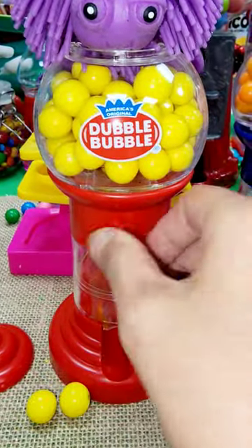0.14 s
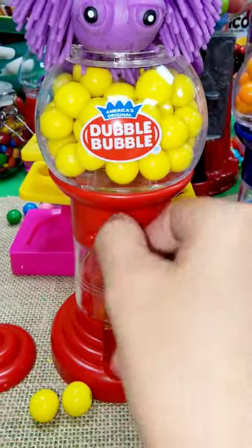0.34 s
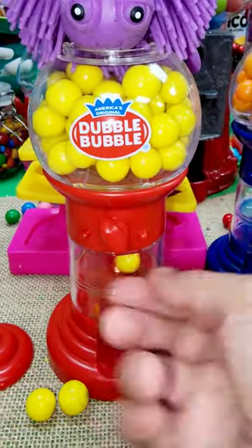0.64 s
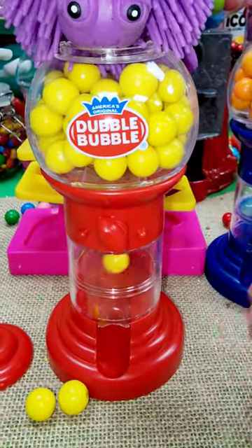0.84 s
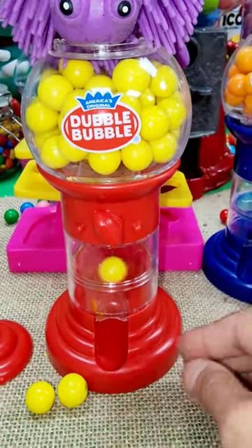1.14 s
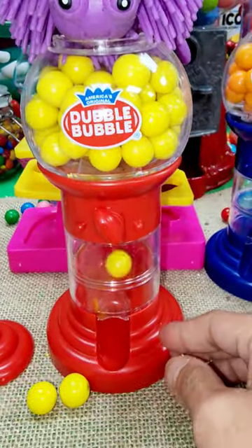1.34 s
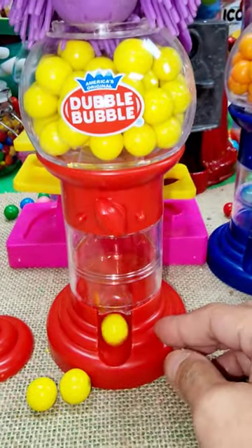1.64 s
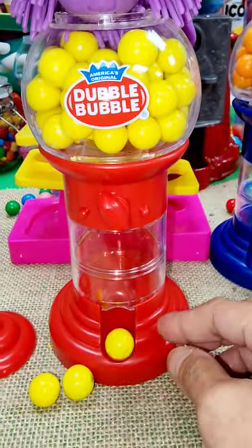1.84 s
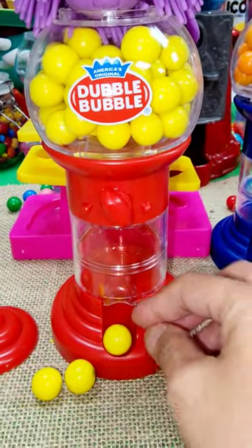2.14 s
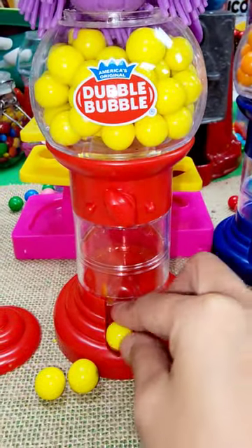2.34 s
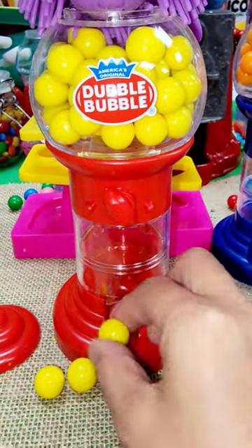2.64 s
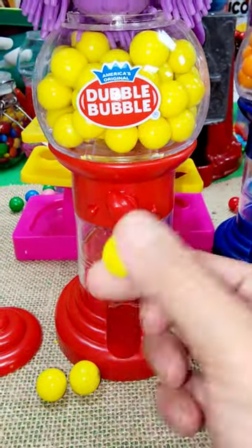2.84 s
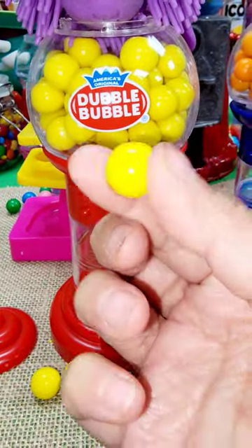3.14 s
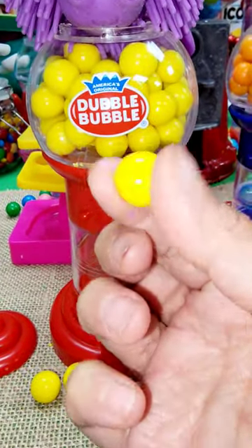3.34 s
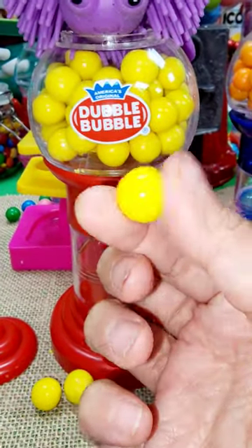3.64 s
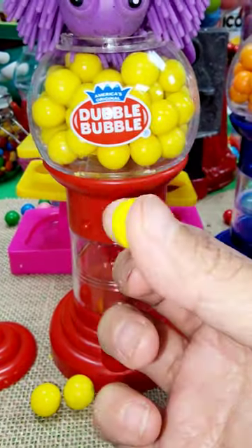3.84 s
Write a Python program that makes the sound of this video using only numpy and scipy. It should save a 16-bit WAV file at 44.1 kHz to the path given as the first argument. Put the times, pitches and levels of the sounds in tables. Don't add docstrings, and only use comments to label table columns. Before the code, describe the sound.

Close up in a small room, a gumball chatters down a hollow plastic tower and ends in hard clacks, then soft handling ticks and rubs, with a quiet motor hum throughout.

```python
import sys
import numpy as np
from scipy import signal
from scipy.fft import rfft, irfft, next_fast_len
from scipy.io import wavfile
from scipy.ndimage import map_coordinates

SR = 44100
rng = np.random.default_rng(int(sys.argv[2]) if len(sys.argv) > 2 else 0)


def log_audio(samples):
    frames = np.atleast_2d(samples).T
    limited = np.clip(frames, -1, 1)
    pcm = np.round(limited * 32767).astype(np.int16)
    wavfile.write(sys.argv[1], SR, pcm)


def to_linear_factor(level_db):
    exponent = np.asarray(level_db, float) / 20
    return 10 ** exponent


N = 176400

# (f/Hz, level/dB, t60/s)
TOWER = [(686, -17.5, 0.04), (838.7, -12.5, 0.047), (960, -3, 0.014), (1303, -11, 0.02),
         (1758, -2.5, 0.015), (1930, -1.5, 0.013), (2245, -12, 0.035), (3151, -17.5, 0.028),
         (3940, -2.5, 0.013), (4670, -6, 0.018), (5600, -13, 0.009), (6376, -15, 0.045), (6920, -6, 0.012),
         (7316, -4.5, 0.041)]
# (f/Hz, level/dB, t60/s)
RIM = (8000, -10, .012)
LOWER_TOWER = TOWER[:-1] + [RIM]
# (f/Hz, level/dB, t60/s)
CHUTE = [(700, -13, 0.011), (1000, -21.5, 0.011), (1450, -10, 0.024), (1820, -0.5, 0.02), (1955, -1, .02),
         (2250, -2, 0.016), (2880, 0, 0.022), (3900, -1, 0.012), (4550, -3, .013), (5500, -2.5, 0.0087),
         (6050, 0.5, 0.0076), (6620, -2.5, 0.017), (7400, -13, 0.019)]
TOWER_PAN_DB = -5.5


def unit(x):
    return x / np.sqrt(np.mean(x ** 2) + 1e-20)


def along(points, hz):
    f, v = np.transpose(points)
    return np.interp(np.log(hz + 1), np.log(f + 1), v)


def level(rows, s):
    t, db = np.transpose(rows)
    return np.interp(s, t, db, left=-120, right=-120)


def wobble(rate):
    knots = rng.standard_normal(int(N * rate / SR) + 4)
    return map_coordinates(knots, [np.arange(N) * rate / SR])


def filtered(x, response):
    m = next_fast_len(N + 8192)
    return irfft(rfft(x, m) * response(np.fft.rfftfreq(m, 1 / SR)), m)[..., :N]


def sides(pan_db):
    return to_linear_factor(np.multiply.outer([.5, -.5], pan_db))


def rush(spectrum, alike):
    def mid_side(hz):
        turn = np.arccos(np.clip(along(alike, hz), -1, 1)) / 2
        return to_linear_factor(along(spectrum, hz)) * [np.cos(turn), np.sin(turn)]

    mid, side = filtered(rng.standard_normal((2, N)), mid_side)
    return unit(np.array([mid + side, mid - side]))


def struck(hits, pan_db, modes, contact_s, colour_db, ring_db, crack_db, twist,
           grind=0., hollow=0.18, tilt_db=0., spot_db=0., blow=0.82):
    # (f/Hz, level/dB per Hz)
    snap_spectrum = [(600, -21), (1800, -18), (2600, -10.5), (4300, -11), (7600, -5), (9200, -22.5),
                     (11700, -17.5), (16500, -20)]
    s, db = np.transpose(hits)[:2]
    mode_hz, modes_db = np.transpose(modes)[:2]
    at = np.round(s * SR).astype(int)
    t = np.arange(SR // 20) / SR
    scrape = np.exp(-(t / contact_s) ** 0.93) * (1 - np.exp(-t / (0.15 * contact_s)))
    push = np.hanning(7)

    tilt = np.outer(tilt_db + 0 * s, np.log2(mode_hz / 3000))
    mix = to_linear_factor(colour_db * rng.standard_normal((len(s), len(modes))) + tilt)
    if spot_db:
        octaves = np.log2(np.outer(1 / np.transpose(hits)[-1], mode_hz))
        mix = mix * to_linear_factor(spot_db * np.exp(-(octaves / .08) ** 2))
    mix = mix / np.sqrt((mix ** 2) @ to_linear_factor(2 * modes_db))[:, None]

    def force(share, noise=1, push_gain=0):
        train = np.array([np.bincount(at, g * to_linear_factor(db) * share, N) for g in sides(pan_db + 0 * s)])
        rough = signal.oaconvolve(train, scrape[None], axes=1)[:, :N] * noise
        return rough + push_gain * signal.oaconvolve(train, push[None], axes=1)[:, :N]

    snap = to_linear_factor(0.53 * (db - db.max()) + 2 * tilt_db + 2 * rng.standard_normal(len(s)))
    crack = to_linear_factor(crack_db) * (force(snap) + grind) * rush(snap_spectrum, [(1000, .9), (8000, 0.1)])
    out = 0
    noise = rng.standard_normal((len(modes), N))
    for k, (hz, mode_db, t60) in enumerate(modes):
        pole = np.exp((2j * np.pi * hz - np.log(1000) / max(t60, .002)) / SR)
        drive = force(mix[:, k], noise[k], blow) + hollow * grind * noise[k]
        ring = signal.lfilter([1], [1, -pole], drive, axis=1)
        lean = np.exp(1j * twist * rng.standard_normal() * np.array([[.5], [-.5]]))
        out = out + to_linear_factor(mode_db + ring_db) * (lean * ring).imag / np.sqrt(contact_s * SR)
    return crack + signal.sosfilt(signal.butter(4, 8600, fs=SR, output="sos"), out)


def ball():
    # (t/s, peak level/dB, best-rung mode f/Hz)
    bounces = [(0.0181, -10, 6110), (0.0427, -10, 7130), (0.0686, -10, 6850), (0.0895, -16.5, 6780),
               (0.11, -14, 7190), (0.1344, -13.5, 7360), (0.1556, -20, 3930), (0.1698, -13, 3900),
               (0.1921, -15, 3820), (0.2104, -17, 6700), (0.2259, -25.5, 6970), (0.2308, -14, 7130),
               (0.2475, -24, 4540), (0.2567, -17, 6600), (0.2665, -21.5, 1730), (0.2826, -15.5, 1860),
               (0.2921, -20.5, 996), (0.3056, -16, 2205), (0.3467, -12.5, 5700), (0.3541, -13.5, 3130),
               (0.3605, -19.5, 3230), (0.3747, -23, 1990), (0.3976, -10.5, 7100), (0.4024, -16.5, 7300),
               (0.4218, -29, 3070), (0.4291, -33.5, 2410), (0.4431, -15, 3180), (0.4674, -26.5, 6900),
               (0.5016, -28.5, 6680), (0.5173, -17.5, 3900), (0.5248, -18, 3940), (0.5318, -21, 1770),
               (0.5395, -22.5, 6120), (0.5476, -24.5, 4160), (0.5553, -25, 6240), (0.5624, -29, 4150),
               (0.5695, -26.5, 960), (0.6539, -24, 4390), (0.6987, -32.5, 1690), (0.72, -32, 4850),
               (0.73, -25.5, 4620), (0.7475, -24, 4880), (0.7654, -21.5, 1713), (0.772, -26.5, 1640),
               (0.8003, -36, 1063), (0.8413, -32, 983)]
    # (t/s, peak level/dB, best-rung
    # mode f/Hz)
    knocks = [(0.8846, -38, 1060), (0.8951, -31.5, 1770), (0.9145, -24, 3730), (0.9232, -25, 3830),
              (0.9311, -19, 4540), (0.939, -23.5, 2930), (0.947, -24, 7080), (0.9531, -20.5, 3960),
              (0.9601, -18.5, 3920), (0.9671, -22, 1680), (0.9771, -21, 1790), (0.9908, -24, 4800),
              (1.0265, -17.5, 3960), (1.0386, -16.5, 3010), (1.0472, -22.5, 7130), (1.0549, -21.5, 3380),
              (1.065, -24, 3920), (1.0812, -28.5, 1770), (1.0883, -23.5, 4800), (1.0959, -18, 3960),
              (1.1007, -17, 3730), (1.1103, -20, 2370), (1.1193, -13.5, 3980), (1.129, -17, 3960),
              (1.1334, -13.5, 6890), (1.1555, -15.5, 4070), (1.1686, -18, 1740), (1.1938, -34.5, 7130),
              (1.2027, -7.5, 3960), (1.2241, -15, 1770), (1.2327, -20, 4870), (1.2421, -26, 4290),
              (1.2474, -20, 4540), (1.255, -13.5, 4050), (1.2612, -14.5, 3980), (1.2673, -15, 4520),
              (1.2731, -19.5, 7560), (1.2827, -10.5, 4030), (1.2902, -12.5, 3940), (1.2991, -16, 2260),
              (1.3129, -27, 1740), (1.3233, -27.5, 3940), (1.3407, -22.5, 4870), (1.348, -19.5, 3880),
              (1.3563, -17, 3640), (1.3657, -14, 7300), (1.3732, -9, 6800), (1.3871, -11.5, 3980),
              (1.3976, -16.5, 4010), (1.4089, -15.5, 4820), (1.4146, -18.5, 4390), (1.4319, -8.5, 4520),
              (1.4376, -15, 1460), (1.4467, -18, 4720), (1.458, -20.5, 4720), (1.4672, -21.5, 3640),
              (1.073, -28.5, 3900),
        (1.4046, -18, 4000),
        (1.4214, -16.5, 2000),
        (1.523, -21, 6900),
    ]
    # (t/s, peak level/dB, left-right/dB, brightness/dB per octave, best-rung mode f/Hz)
    clacks = [(1.484, -2, 0.5, 1.1, 1820), (1.4994, -7, -4.5, 0.5, 4550), (1.5283, -2.5, 4, 2.6, 1940),
              (1.5635, -18.5, -0.5, 2, 6050), (1.5860, -2.5, -1.5, -0.7, 6050),
              (1.622, -8, -8.5, -0.3, 6700), (1.6387, -5, -4, 1, 3900), (1.6504, -13, -7, -0.6, 3900),
              (1.6823, -7.5, -8, 3, 3900), (1.701, -17.5, -6, -3, 1450), (1.7146, -26.5, -1, -3.5, 1450),
              (1.7219, -21.5, -1.5, -3.7, 1600)]
    clack_pan_db, clack_tilt_db = np.transpose(clacks)[2:4]
    upper = struck(bounces, TOWER_PAN_DB, TOWER, contact_s=0.0027, colour_db=3, ring_db=3.0,
                   crack_db=-5, twist=1.2, spot_db=9.5)
    lower = struck(knocks, TOWER_PAN_DB, LOWER_TOWER, contact_s=0.0018, colour_db=3.0,
                   ring_db=3.0, crack_db=-8.5, twist=1.8, spot_db=11)
    chute = struck(clacks, clack_pan_db, CHUTE, contact_s=0.0034, colour_db=2.5, ring_db=1.3,
                   crack_db=-10.5, twist=1.6, tilt_db=clack_tilt_db, spot_db=9.5, blow=1.8)
    return upper + lower + chute + rolling()


def rolling():
    # (t/s, level/dB)
    roll = [(0, -44), (.27, -36), (.33, -41), (.53, -36), (.63, -56), (.66, -43), (.765, -31), (.81, -53),
            (.88, -47.5), (.96, -27), (1.018, -42), (1.08, -29), (1.19, -42), (1.26, -30), (1.33, -41),
            (1.415, -26), (1.48, -41)]
    ticks_per_s, jitter, spread_db = 120, 0.28, 5.5
    draw = rng.standard_normal((SR // 150, 2))
    s = np.abs(np.arange(len(draw)) + jitter * draw[:, 0]) / ticks_per_s
    ticks = np.transpose([s, level(roll, s) - 7 + spread_db * draw[:, 1]])
    grind = to_linear_factor(level(roll, np.arange(N) / SR) - 12 + 4.4 * wobble(90))
    grind = grind * sides(TOWER_PAN_DB)[:, None]
    return struck(ticks, TOWER_PAN_DB, LOWER_TOWER, contact_s=0.0016, colour_db=3.0, ring_db=10.5,
                  crack_db=-1, twist=0.69, grind=grind)


def fingers():
    # (t/s, peak level/dB, brightness/dB per octave, best-rung mode f/Hz)
    taps = [
        (1.8782, -48.5, -12, 1450),
        (1.9255, -46, 0, 1820),
        (1.9431, -34, -12.5, 2250),
        (1.978, -42.5, 3.5, 7400),
        (2.111, -38, -11.5, 700),
        (2.1864, -38, -4, 6650),
        (2.2252, -40, 4, 6650),
        (2.277, -53, 7, 1450),
    ]
    # (t/s, length/s, level/dB)
    scrapes = [
        (1.97, 0.14, -60),
        (2.118, 0.079, -51),
        (2.183, 0.11, -48.5),
        (2.25, 0.38, -64),
        (2.395, 0.05, -52),
        (2.51, 0.072, -59),
    ]
    # (t/s, length/s, level/dB)
    rubs = [
        (2.6, 0.52, -72),
    ]
    # (f/Hz, level/dB per Hz)
    skin = [(1760, -44), (3000, -6), (7310, 2.5), (10100, -21), (15100, -10), (16500, -34)]
    t = np.arange(N) / SR

    def strokes(rows):
        total = 0
        for s, long_s, db in rows:
            progress = np.clip((t - s) / long_s, 0, 1)
            total = total + to_linear_factor(db) * np.sin(np.pi * progress ** .6) ** 1.2
        return total

    grind = strokes(scrapes) * to_linear_factor(3.24 * wobble(110)) * sides(-6.5)[:, None]
    touches = struck(taps, -6.0, CHUTE, contact_s=0.0049, colour_db=1.0, ring_db=5.5, crack_db=-21.5,
                     twist=1.4, grind=grind * to_linear_factor(7.5), hollow=0.12,
                     tilt_db=np.transpose(taps)[2], spot_db=10)
    rub = strokes(rubs) * to_linear_factor(1.45 * wobble(37.48)) * rush(skin, [(2000, .5), (8000, 0.19)])
    return touches + rub


def table():
    # (t/s, level/dB)
    shake = [(0, -55.5), (1.5, -57.5), (1.75, -71)]
    # (f/Hz, level/dB per Hz)
    rumble = [(30, -16), (80, -5), (450, -7), (800, -8.5), (1300, -38.5)]
    swell = to_linear_factor(level(shake, np.arange(N) / SR) + 2.4 * wobble(8.4))
    return swell * rush(rumble, [(60, 0.76), (800, 0.81)])


def room(x):
    # (f/Hz, t60/s)
    early = [(500, 0.1), (4000, 0.11), (14000, 0.012)]
    late_db, late_t60_s, late_top_hz = -10.5, 0.64, 8000
    hz, t, z = signal.stft(rng.standard_normal((2, SR)), SR, nperseg=256)
    hz = hz[:, None]
    fade = to_linear_factor(-60 * t / along(early, hz))
    fade = fade + to_linear_factor(late_db - 60 * t / late_t60_s) / (1 + (hz / late_top_hz) ** 2)
    tail = signal.istft(z * fade, SR, nperseg=256)[1]
    return signal.fftconvolve(x.mean(0)[None], tail / np.linalg.norm(tail[0]), axes=1)[:, :N]


def fan():
    # (f/Hz, level/dB per Hz)
    air = [(20, -31), (95, -18), (200, -2.5), (520, -22.5), (1900, -33), (3300, -43.5), (8000, -47),
           (9200, -63.5)]
    # (f/Hz, correlation)
    air_alike = [(60, 0.5), (380, 0.65), (2380, -0.52), (15000, 0.01)]
    # (f/Hz, rms level/dB, left-right/dB)
    hum = [(101.2, -68, 1.5), (149.4, -57, -0.5), (190.8, -53, 1), (247.5, -57, 0.5), (299.1, -57, -2.5),
           (1894, -79.5, 4), (2760, -85, 1)]
    # (f/Hz, width/Hz, rms level/dB, left-right/dB)
    breath = [(182.5, 8.6, -51, 0.5), (354.4, 16, -62.5, -5.5), (5420, 300, -86.5, -5.5)]
    t = np.arange(N) / SR
    out = to_linear_factor(-52.5 + 2.1 * wobble(2.917)) * rush(air, air_alike)
    for hz, db, pan_db in hum:
        sway_db = 3.5 if hz < 500 else 1.2
        strength = to_linear_factor(db + 2.5 + sway_db * wobble(3.7))
        phase = 2 * np.pi * hz * t + 1.9 * wobble(7) + 9 * rng.random()
        out += np.outer(sides(pan_db), strength * np.sin(phase))
    for hz, width_hz, db, pan_db in breath:
        hiss = rng.standard_normal(N)
        band = unit(filtered(hiss, lambda f: 1 / (1 + (2 * (f - hz) / width_hz) ** 2)))
        out += np.outer(sides(pan_db), to_linear_factor(db) * band)
    return out


def scene():
    # (f/Hz, left-right/dB)
    shading = [(500, 15), (1200, 2.5), (5000, -7.5), (9000, 0), (15000, 9)]
    small = signal.butter(5, 704, "high", fs=SR, output="sos")
    near = signal.sosfilt(small, ball() + fingers())
    near = .8 * signal.lfilter(*signal.iirnotch(2615, 18, SR), near) + .2 * near
    ports = filtered(near, lambda hz: sides(along(shading, hz)))
    return ports + to_linear_factor(-11.5) * room(near) + fan() + table()


def top_cut(x):
    return signal.sosfilt(signal.butter(12, 16620, fs=SR, output="sos"), x)


def record(dry):
    dry = filtered(dry, lambda hz: 1 / (1 + (hz / 15850) ** 70))
    mix = dry / (1 + np.abs(dry) ** 8) ** (1 / 8)
    return top_cut(mix)


dry = scene()
out = record(dry)
log_audio(out)
```